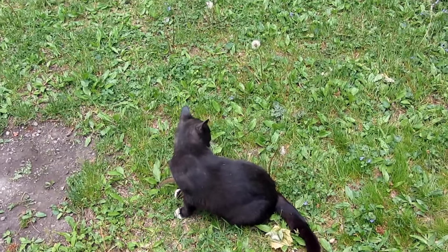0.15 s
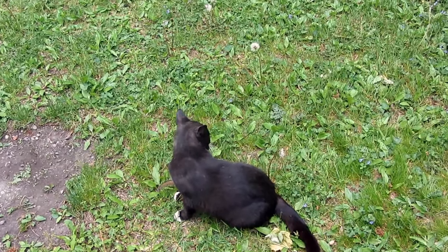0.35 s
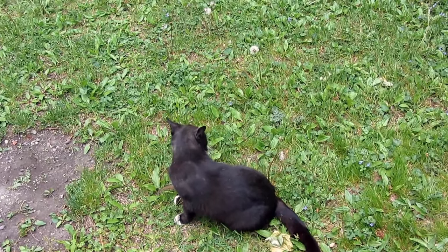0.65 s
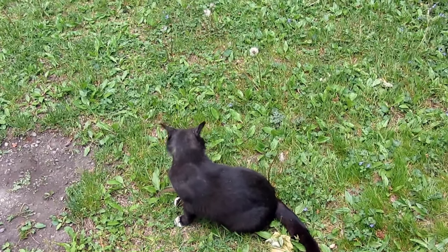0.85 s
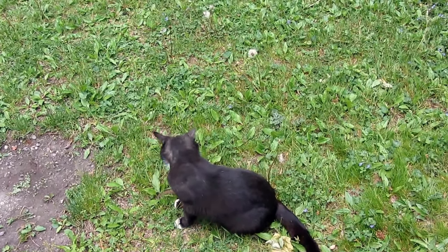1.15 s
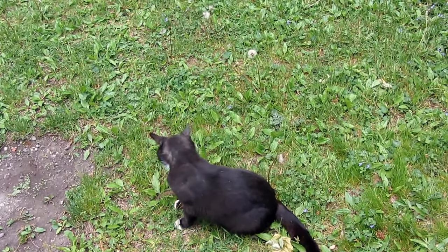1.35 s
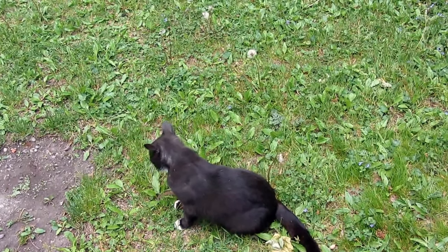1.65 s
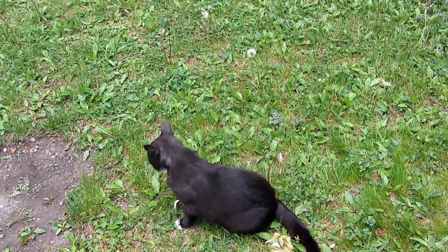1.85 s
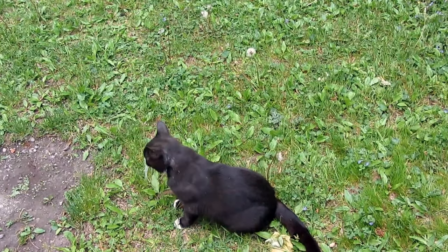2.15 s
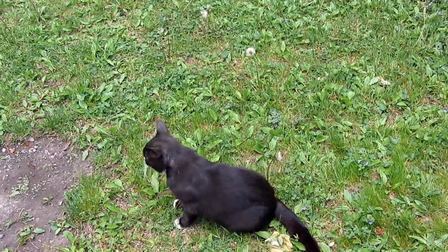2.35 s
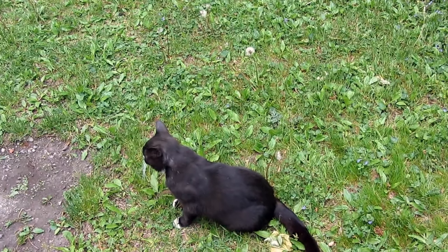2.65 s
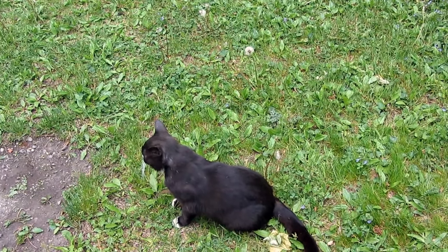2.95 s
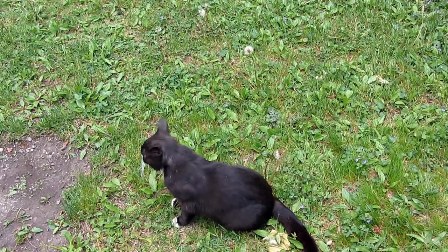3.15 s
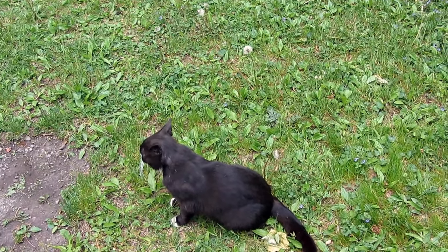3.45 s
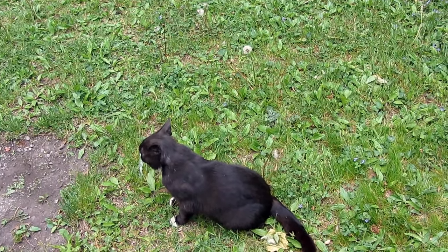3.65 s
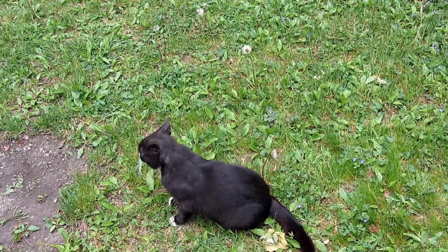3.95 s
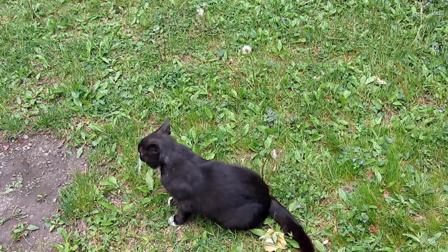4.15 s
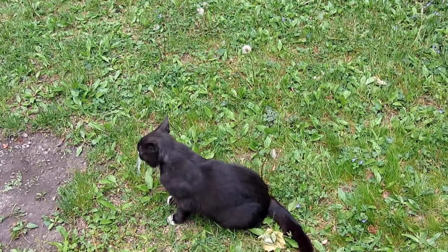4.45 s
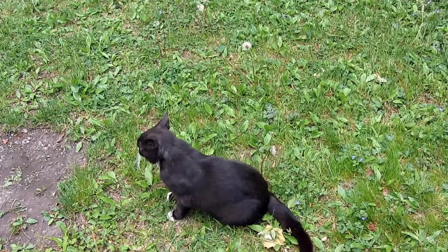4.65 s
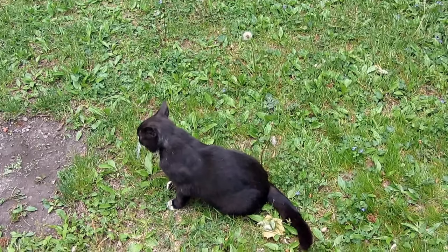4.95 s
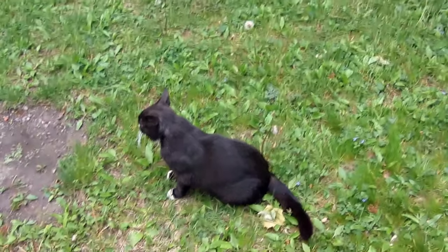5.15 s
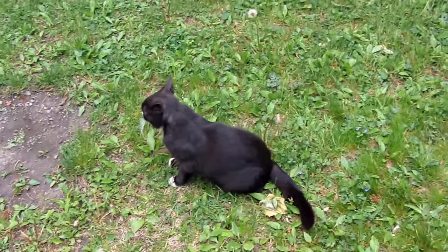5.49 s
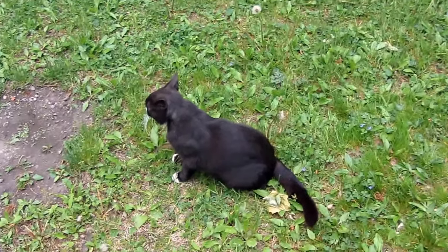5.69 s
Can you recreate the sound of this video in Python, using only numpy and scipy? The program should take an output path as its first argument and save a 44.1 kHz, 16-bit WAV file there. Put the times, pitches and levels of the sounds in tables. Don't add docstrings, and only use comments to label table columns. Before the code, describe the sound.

A quiet grassy outdoor place with a road nearby; the black cat seen sitting there makes no sound. From 0 s there is low road rumble, soft mid tyre roar and a droning vehicle drawing away and fading. Rough engine barks poke through at about 0.3, 0.5 and 0.6 s. Around 0.9 s a heavy engine swells, dips slightly, then from about 2 s holds a deep, lumpy idle, near 90 Hz, to the end at 5.8 s. Its raspy upper tones peak near 1.6 s. A second motor rises at 1.7 s and later fades with sagging pitch. Cars pass as soft swells, strongest at 1.7 s, then about 2.9, 3.5, 4 and 4.9 s. Thin squeals appear near 1.7 s, and tiny ticks at 2.8-3, 3.7-4.2 and after 5 s. Leaves hiss faintly in gusts. Small close-spaced stereo microphones add steady faint hiss.

```python
import sys
import numpy as np
from scipy import signal
from scipy.fft import rfft, irfft, next_fast_len
from scipy.io import wavfile

SR = 44100
rng = np.random.default_rng(int(sys.argv[2]) if len(sys.argv) > 2 else 0)


def pcm_store(signal):
    levels = np.round(np.clip(np.atleast_2d(signal), -1, 1) * 32767)
    wavfile.write(sys.argv[1], SR, levels.astype(np.int16).T)


def volts_from_decibels(level):
    exponent = np.asarray(level, float) / 20
    return 10 ** exponent


N = 256793
PAD = next_fast_len(N + 8192)

# frequency_hz [Hz], lead_rad [rad]
PORT_LEAD = [(40, 1.5), (90, 1.41), (200, 1.1), (500, 0.75), (900, 0.97), (1250, 0.83), (1700, 0.43),
             (2150, 1.2), (2600, 2.4), (3400, 1.8), (4300, 4.4), (5600, 4.6), (7500, 6.8)]
# frequency_hz [Hz], lean_db [dB]
PORT_LEAN = [(45, -12.5), (60, -4), (90, -1), (150, 1.5), (300, 3), (550, 4), (900, 5.5), (1340, 6),
             (2090, 1), (3300, 4), (8000, 1)]
# frequency_hz [Hz], shared_part [power ratio]
PORT_COHERENCE = [(40, .93), (130, 0.98), (300, 0.79), (430, .55), (650, 0.73), (1100, 0.61), (1500, 0.43),
                  (2300, 0.71), (3200, 0.19), (5500, 0.3), (7000, .1), (12000, .03)]
# frequency_hz [Hz], density_db [dB per Hz]
PREAMP_SPECTRUM = [(2000, -29), (5000, -1.5), (7000, 0.5), (8300, -2), (9700, -7.5), (11000, -13),
                   (11700, -18.5), (12400, -26.5), (13100, -20), (15600, -23)]

# frequency_hz [Hz], density_db [dB per Hz]
LEAF_SPECTRUM = [(1800, -81.5), (3200, -23), (3900, -3.5), (4800, -2.5), (5600, -3), (6300, -8.5),
                 (7300, -14), (8300, -21.5), (9500, -38), (12000, -81)]
# centre_s [s], length_s [s], swell_db [dB]
GUSTS = [
    (.1, .15, 2),
    (1.73, .13, 7.5),
    (2.4, .3, 1.2),
    (2.92, .12, 3),
    (4.15, 0.16, 3),
    (4.62, .1, 2.5),
]

# frequency_hz [Hz], density_db [dB per Hz]
RUMBLE_SPECTRUM = [(15, -39), (30, -12), (45, -19), (70, -0.5), (110, 2.5), (170, -7), (230, -9.5),
                   (350, -11.5), (500, -32), (1000, -84)]
BOOM_SPECTRUM = [(150, -82.5), (235, -20.5), (268, -2.5), (285, 3.5), (305, -1.5), (330, -7), (370, -31.5),
                 (600, -95)]
ROAR_SPECTRUM = [(220, -38), (380, -15.5), (465, -12), (565, -5.5), (802, -3), (995, -0.5), (1270, -5),
                 (1490, -7.5), (1900, -16), (2470, -35), (4180, -120)]
HISS_SPECTRUM = [(700, -92), (1300, -23), (1700, -1), (2060, -4), (2260, -2), (2630, -4.5), (3120, -12),
                 (3600, -16), (4100, -24.5), (4800, -39), (7000, -100)]
DRONE_SPECTRUM = [(150, -61.5), (300, -9), (400, 0), (520, 0.5), (700, -20.5), (1200, -71.5)]
# centre_s [s], length_s [s], roar_swell_db [dB], hiss_swell_db [dB]
CARS = [
    (1.2, 0.24, 2.5, 2),
    (1.74, 0.13, 6.5, 4),
    (2.2, 0.23, 2.5, 2.5),
    (2.87, 0.22, 4, 5.5),
    (3.47, 0.14, 3, 3),
    (4.05, 0.31, 2.5, 3.5),
    (4.87, 0.18, 4.3, 4),
    (5.3, 0.26, 2, 3),
]
# centre_s [s], length_s [s], pitch_hz [Hz], width_hz [Hz], level_db [dB]
SQUEALS = [(1.6, .06, 5560, 120, -69), (1.7, .03, 5500, 250, -60), (1.794, .007, 5800, 300, -55),
           (1.86, .02, 5700, 200, -66), (2.817, .004, 3950, 300, -59), (2.94, .005, 5300, 300, -59),
           (3.035, .008, 2700, 250, -49), (3.73, .008, 2300, 250, -49), (4.08, .004, 3950, 300, -61),
           (4.16, .004, 3900, 300, -59), (4.249, .004, 3900, 300, -59), (4.74, .008, 3900, 400, -59),
           (5.07, .022, 3550, 350, -53.5), (5.155, .012, 3500, 300, -57), (5.52, .01, 3500, 250, -57),
           (5.6, .01, 3600, 300, -56), (5.715, .008, 3500, 250, -57), (5.785, .01, 3500, 250, -57)]

# pitch_hz [Hz], relative_level_db [dB]
MOTOR_LINES = [(121, 5), (163, 2), (193, -1), (211, -8.5), (233, -10), (284, -9.5), (298, -11.5)]
# time_s [s], level_db [dB], pitch_factor [ratio]
MOTOR_PASS = [(0, -44.5, 0.97), (.3, -47, 1.12), (.6, -42.5, 0.97), (.9, -49.5, 1.12), (1.4, -47.5, 1.09),
              (1.7, -38.5, 1), (2.1, -41, 1.005), (2.6, -41.5, .995), (3.4, -41, 0.97), (4.2, -46.5, 1.024),
              (5.82, -53.5, 0.88)]

# time_s [s], cycle_rate_hz [cycles per s]
ENGINE_SPEED = [(0, 11.417), (.2, 11.42), (.6, 11.27), (.8, 11.277), (1.2, 11.446), (1.4, 11.43),
                (1.6, 11.296), (1.8, 11.218), (2.2, 11.235), (2.6, 11.196), (3.1, 11.236), (3.8, 11.152),
                (4.0, 11.148), (4.5, 11.174), (5.0, 11.135), (5.3, 11.162), (5.82, 11.154)]
# [dB, upper orders]
EXHAUST = [(0, -48, -41.5), (.25, -41, -41), (.5, -39.5, -41.5), (.75, -42, -42.5), (.9, -27, -44),
           (1.1, -35.5, -41), (1.35, -34, -37), (1.6, -30.5, -25), (2.0, -26.5, -31.5), (2.4, -26.5, -37),
           (2.9, -26.5, -38.5), (3.35, -25, -37.5), (3.85, -29.5, -34.5), (4.3, -25, -35),
           (4.7, -24.5, -35.5), (5.0, -26.5, -37), (5.4, -23, -37.5), (5.82, -27.5, -35.5)]
# order [per cycle], relative_level_db [dB], control [0 firing, 1 low, 2 tenth, 3 upper]
LESSER_ORDERS = [(4, -24, 1), (6, -9, 1), (7, -8, 1), (9, -22, 0), (11, -4, 2), (12, -5, 3), (13, -5, 3),
                 (14, -10, 3), (15, -15, 3), (16, -8, 3), (17, -14, 3), (18, -21, 3), (19, -20, 3)]
# centre_s [s], length_s [s], fifth_db [dB], tenth_db [dB]
EVEN_SPELLS = [
    (1.35, .2, -5, 1),
    (2.65, 0.16, 0, -2),
    (3.9, .25, 2.5, -6),
    (4.82, 0.12, -5.5, -5),
]
# centre_s [s], length_s [s], rasp_db [dB]
HARD_FIRINGS = [
    (.262, 0.022, 7),
    (.522, 0.018, 8.5),
    (.61, 0.02, 8.5),
    (1.05, .02, 4.5),
    (1.15, .02, 4),
]

FULL_LOAD_DB, FULL_RASP_DB = -26, -35


def rms_one(x):
    return x / np.sqrt(np.mean(x ** 2) + 1e-20)


def in_time(rows):
    time_s, *columns = np.transpose(rows)
    t = np.arange(N) / SR
    return [np.interp(t, time_s, column) for column in columns]


def swells(rows):
    centre_s, length_s, *columns = np.transpose(rows)
    t = np.arange(N)[:, None] / SR
    bells = np.exp(-0.5 * ((t - centre_s) / length_s) ** 2)
    return [bells @ column for column in columns]


def at_bins(points):
    bin_hz = np.arange(1, PAD // 2 + 2) * SR / PAD
    hz, value = np.array(points).T
    return np.interp(np.log(bin_hz), np.log(hz), value)


def drift(rate_hz):
    every, settle = 40, 4000
    pole = np.exp(-2 * np.pi * every * rate_hz / SR)
    noise = rng.standard_normal(N // every + settle + 2)
    slow = signal.lfilter([1], [1, -2 * pole, pole * pole], noise)[settle:]
    slow = rms_one(slow - slow.mean())
    return np.interp(np.arange(N) / every, np.arange(len(slow)), slow)


def port_turn_and_lean():
    return np.exp(0.5j * at_bins(PORT_LEAD)), volts_from_decibels(at_bins(PORT_LEAN) / 2)


def ports(x):
    turn, lean = port_turn_and_lean()
    left = lean * turn
    pair = np.array([left, 1 / left])
    mid = np.maximum(abs(pair.mean(axis=0)), 0.5)
    return irfft(rfft(x, PAD) * pair / mid, PAD)[:, :N]


def far_noise(spectrum, flicker_db):
    shared, left, right = rfft(rng.standard_normal((3, PAD)))
    alike = np.clip(at_bins(PORT_COHERENCE), 0, 1)
    turn, lean = port_turn_and_lean()
    wave, diffuse = np.sqrt(alike) * shared, np.sqrt(1 - alike)
    pair = np.array([lean * (wave * turn + diffuse * left),
                     (wave / turn + diffuse * right) / lean])
    mid = np.sqrt(lean ** 2 + lean ** -2 + 2 * alike * (turn ** 2).real)
    x = irfft(pair * volts_from_decibels(at_bins(spectrum)) / mid, PAD)[:, :N]
    return x / np.std(x.mean(axis=0)) * volts_from_decibels(flicker_db * drift(8.3))


def tone(turns, level_db, wobble_db, waver_rad):
    gain = np.sqrt(2) * volts_from_decibels(level_db + wobble_db * drift(3.5))
    return gain * np.cos(2 * np.pi * turns + waver_rad * drift(1.9))


def preamplifier():
    line = volts_from_decibels(-101) * np.sin(2 * np.pi * 15734 * np.arange(N) / SR)
    return volts_from_decibels(-72) * far_noise(PREAMP_SPECTRUM, flicker_db=0) + line


def leaves():
    level_db = -63.5 + swells(GUSTS)[0]
    return volts_from_decibels(level_db) * far_noise(LEAF_SPECTRUM, flicker_db=0.5)


def road():
    t = np.arange(N) / SR
    roar_db, hiss_db = swells(CARS)
    motor_db, load_db = in_time(MOTOR_PASS)[0], in_time(EXHAUST)[0]
    boom_db = 0.77 * (motor_db + 43) + 0.3 * (load_db - FULL_LOAD_DB) + 1.5 * drift(2.1)
    layers = [   # level_db, spectrum, flicker_db
        (-37 - 0.42 * t, RUMBLE_SPECTRUM, 3.34),
        (-42.5 + boom_db, BOOM_SPECTRUM, 0.59),
        (-35.5 + roar_db, ROAR_SPECTRUM, 0.38),
        (-48 + hiss_db, HISS_SPECTRUM, 0.71),
        (-44.5 - 3 * t, DRONE_SPECTRUM, 1.5)]
    return sum(volts_from_decibels(level_db) * far_noise(spectrum, flicker_db)
               for level_db, spectrum, flicker_db in layers)


def squeals():
    out, t = np.zeros(N), np.arange(N) / SR
    for centre_s, length_s, pitch_hz, width_hz, level_db in SQUEALS:
        radius = np.exp(-np.pi * width_hz / SR)
        poles = [1, -2 * radius * np.cos(2 * np.pi * pitch_hz / SR), radius * radius]
        ring = signal.lfilter([1, -0.19, -2, 0, 1.0], np.convolve(poles, poles), rng.standard_normal(N))
        bell = np.exp(-0.5 * ((t - centre_s) / length_s) ** 2)
        out += volts_from_decibels(level_db) * rms_one(ring) * bell
    return out


def motor():
    level_db, pitch_factor = in_time(MOTOR_PASS)
    motor_time = np.cumsum(pitch_factor) / SR
    return sum(tone(pitch_hz * motor_time + rng.random(), level_db + line_db, wobble_db=2.0, waver_rad=0.56)
               for pitch_hz, line_db in MOTOR_LINES)


def engine():
    (cycle_rate_hz,) = in_time(ENGINE_SPEED)
    load_db, rasp_db = in_time(EXHAUST)
    fifth_swell_db, tenth_swell_db = swells(EVEN_SPELLS)
    rasp_db = rasp_db + swells(HARD_FIRINGS)[0]
    load_change = load_db - FULL_LOAD_DB
    fifth_db = -38 + fifth_swell_db + 0.31 * load_change
    tenth_db = -32 + tenth_swell_db + 0.78 * load_change + 0.3 * (rasp_db - FULL_RASP_DB)
    controls = [load_db, fifth_db, tenth_db, rasp_db]

    turns = np.cumsum(cycle_rate_hz) / SR + 0.064
    pipe_turn = -0.828
    out = tone(8 * turns + pipe_turn, load_db, wobble_db=0.4, waver_rad=0.05)
    out -= tone(5 * turns + pipe_turn, fifth_db, wobble_db=1.7, waver_rad=0.045)
    out += tone(10 * turns + pipe_turn, tenth_db, wobble_db=0.6, waver_rad=0.12)
    for order, relative_db, control in LESSER_ORDERS:
        level_db = controls[int(control)] + relative_db
        out += np.sign(order - 8) * tone(order * turns + pipe_turn, level_db, wobble_db=1.5, waver_rad=0.4)
    return out


def scene():
    return leaves() + road() + ports(squeals() + motor() + engine())


def low_pass(x):
    return signal.sosfilt(signal.butter(12, 15745, fs=SR, output="sos"), x)


def record(dry):
    return low_pass(dry + preamplifier())


dry = scene()
out = record(dry)
pcm_store(out)
```